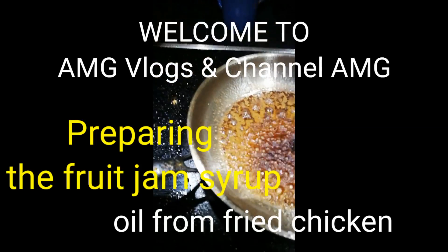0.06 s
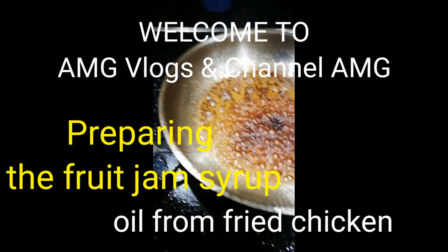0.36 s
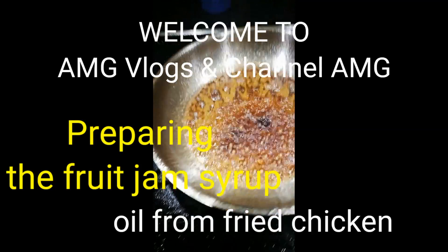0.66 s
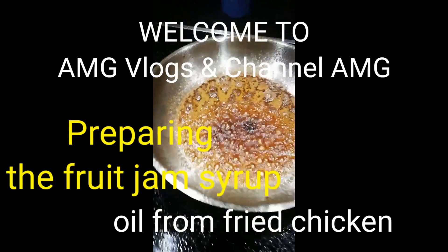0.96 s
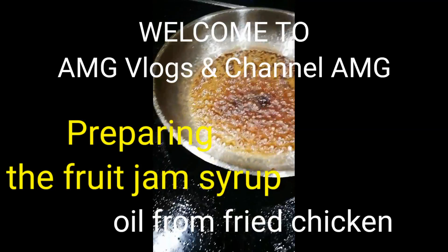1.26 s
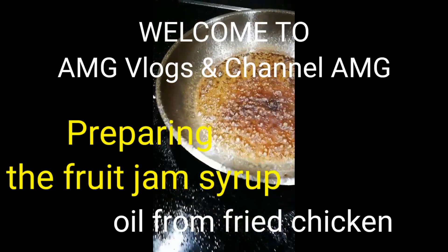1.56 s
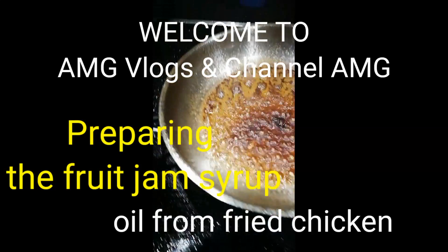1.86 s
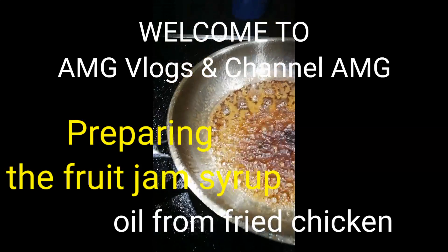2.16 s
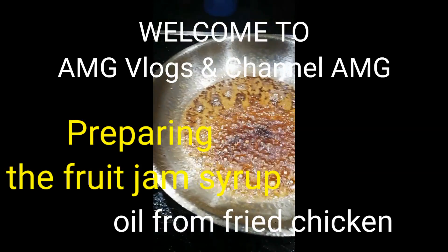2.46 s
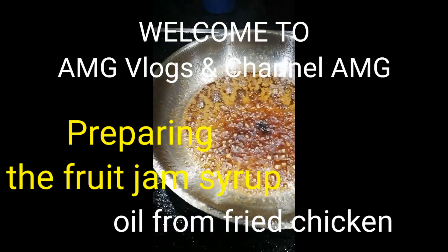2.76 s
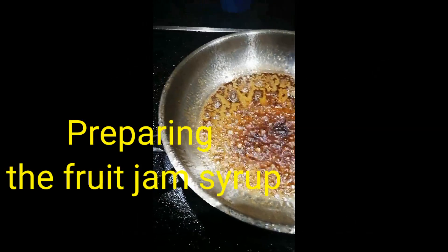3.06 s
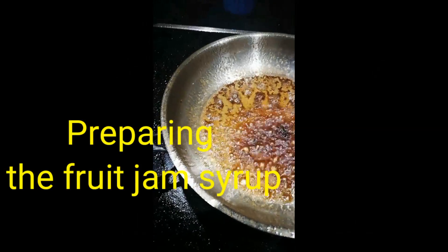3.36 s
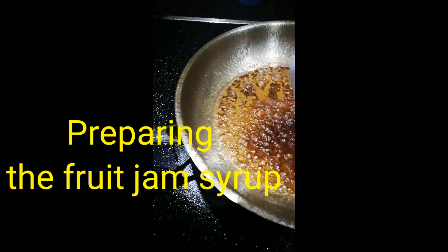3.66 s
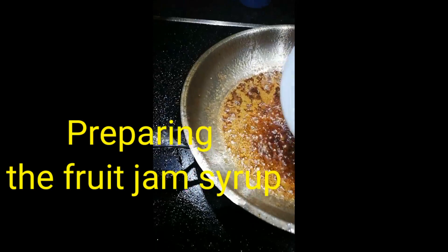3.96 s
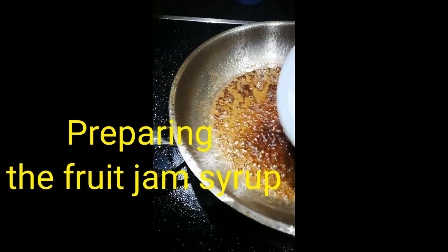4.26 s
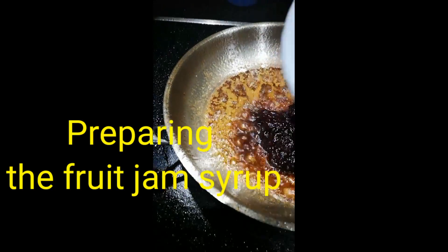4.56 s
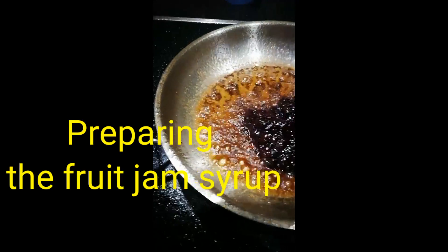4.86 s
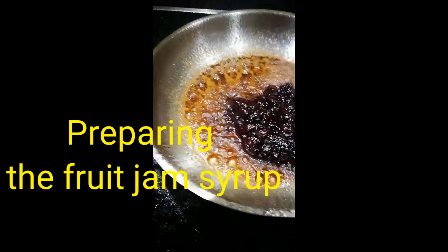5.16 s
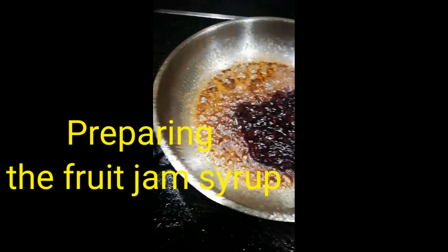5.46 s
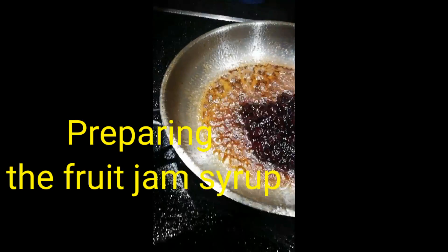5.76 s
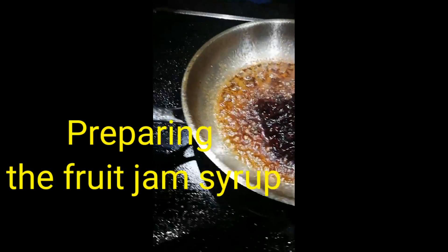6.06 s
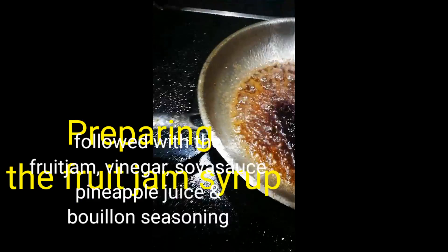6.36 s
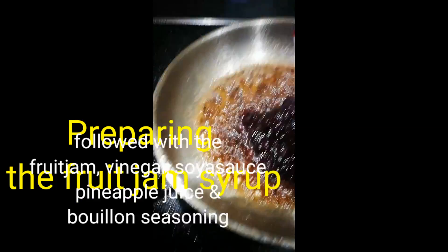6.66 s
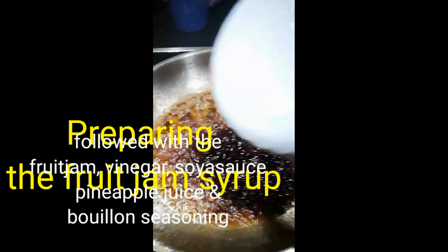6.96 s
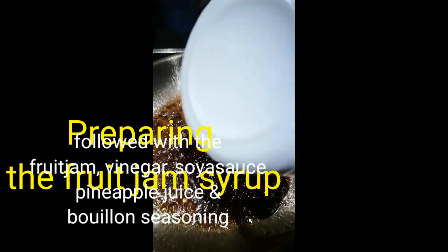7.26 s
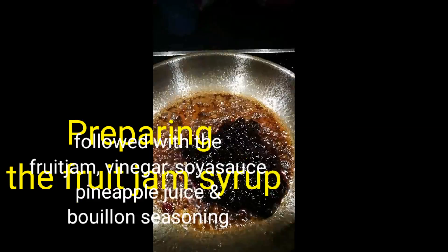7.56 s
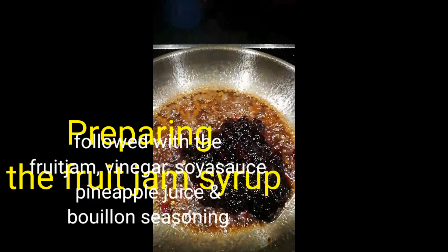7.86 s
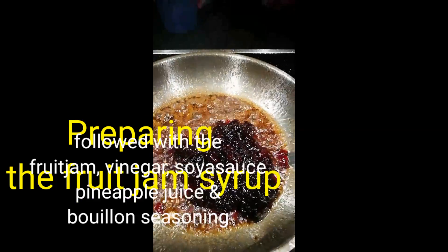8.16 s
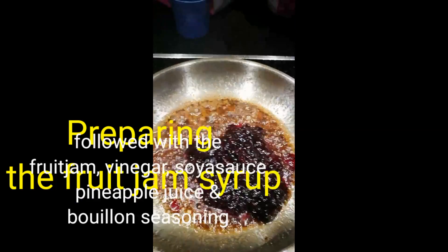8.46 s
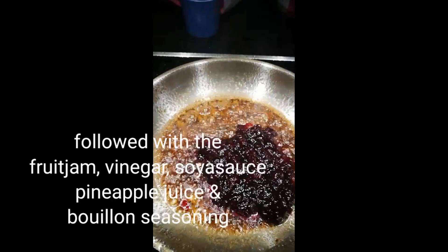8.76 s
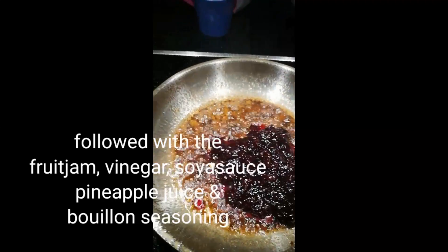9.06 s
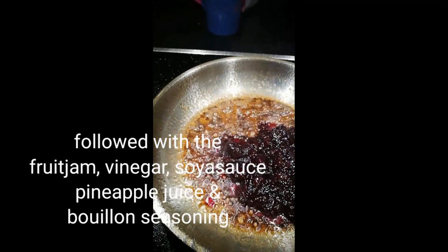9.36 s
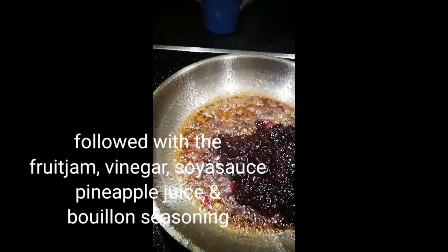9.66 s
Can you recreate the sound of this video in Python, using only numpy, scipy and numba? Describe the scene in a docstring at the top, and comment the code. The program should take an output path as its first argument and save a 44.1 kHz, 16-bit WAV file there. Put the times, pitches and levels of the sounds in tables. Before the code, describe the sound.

Syrup sizzles and bubbles in a frying pan, boiling harder after jam squelches in, and a dish is set down with a knock.

```python
"""Syrup fries in oil in a steel pan: tiny steam bubbles fizz, larger ones boil and simmer, and fat spits.
Each bubble is a damped sine that chirps upward. Halfway a lump of wet jam squelches in and the boil
flares up, its pitch sinking as the syrup thickens. Later a dish is set down beside the pan with a
ringing knock. The stove rumbles underneath, all heard through the two microphone ports of a phone
swaying above the pan."""
import sys
import numpy as np
from scipy import signal
from scipy.fft import rfft, irfft
from scipy.io import wavfile
from scipy.ndimage import uniform_filter1d
from numba import njit

SR = 44100
rng = np.random.default_rng(int(sys.argv[2]) if len(sys.argv) > 2 else 0)


def pcm_store(signal):
    """Save signal as 16-bit PCM."""
    levels = np.round(np.clip(np.atleast_2d(signal), -1, 1) * 32767)
    wavfile.write(sys.argv[1], SR, levels.astype(np.int16).T)


N = 432180
T = np.arange(N) / SR
TOP_HZ = 15400
JAM_S, WETTING_S = 4.29, 0.79  # the jam lands, then takes this long to wet the hot steel

# The fizz's level ride, which boil and simmer partly follow. Each row: time in seconds, relative dB.
FIZZ_RIDE = [(0.0, -35), (0.7, -34.5), (0.78, -35.5), (2.99, -34.5), (3.07, -32), (3.5, -33), (3.75, -33),
             (4.45, -34), (4.59, -37), (4.7, -35), (4.97, -32), (5.92, -36), (6.08, -37), (6.79, -36),
             (7.17, -38.5), (7.5, -35), (7.93, -35), (8.42, -36.5), (9.07, -36.5), (9.75, -37.5)]


def undb(db):
    """Decibels to gain."""
    return 10 ** (np.asarray(db) / 20)


def curve(rows):
    """Join (seconds, value) rows with straight lines in time."""
    return np.interp(T, *np.transpose(rows))


def envelope(start, attack, hold, release):
    """A straight rise to 1, a hold and an exponential release, all in seconds."""
    age = T - start
    return np.clip(age / attack, 0, 1) * np.exp(-np.maximum(age - attack - hold, 0) / release)


def swell(s, half_s, height):
    """A bell-shaped rise or dip centred on s seconds."""
    return height * np.exp(-((T - s) / half_s) ** 2)


def bursts(rows):
    """Gain of bell-shaped bursts. Each row: centre and half length in seconds, relative level in dB."""
    return sum(swell(s, half_s, 0.76) * undb(db) for s, half_s, db in rows)


def walk(rate):
    """Smooth random drift with a spread of 1, taking rate new values a second."""
    step = max(int(SR / rate), 2)
    held = np.repeat(rng.standard_normal(N // step + 1), step)
    drift = uniform_filter1d(held, step)[:N]
    return drift / drift.std()


def cut(x, hz, kind, order):
    """Butterworth high-pass or low-pass."""
    return signal.sosfilt(signal.butter(order, min(hz, TOP_HZ), kind, fs=SR, output="sos"), x + 1e-18)


def over_pitch(rows):
    """Spread the columns of a table over the spectrum, interpolating in log frequency."""
    hz, *columns = np.transpose(rows)
    axis = np.log(np.arange(N // 2 + 1) * SR / N + 1)
    return [np.interp(axis, np.log(hz), column) for column in columns]


def colour(x, rows):
    """EQ a sound through (Hz, dB) points."""
    return irfft(rfft(x) * undb(over_pitch(rows)[0]), N)


def unit(pair, low_hz, high_hz):
    """Scale a stereo pair so that its centre has rms 1 within a band."""
    band = signal.butter(4, [low_hz, high_hz], "band", fs=SR, output="sos")
    return pair / signal.sosfilt(band, pair.mean(axis=0)).std()


def scatter(x, t60, wet_db):
    """Each port hears a sound and its own spray of reflections from pan wall, hob and tiles."""
    t = T[:int(SR * min(t60, 1)) + 2]
    tail = rng.standard_normal((2, len(t))) * undb(-60 * t / t60)
    tail *= undb(wet_db) / np.sqrt(np.sum(tail ** 2, axis=1, keepdims=True))
    return x + signal.oaconvolve(x[None], tail, axes=1)[:, :N]


def ports(pair):
    """Give two streams the likeness, lag and shading of the two microphone ports."""
    # Each row: frequency in Hz, left minus right in dB, likeness from 0 to 1, left lead in radians.
    stereo_image = [(99, 0.5, 0.98, 0.23), (325, -1.2, 0.97, 0.51), (502, -0.5, 0.8, 2.64),
                    (713, 6, 0.4, 4.3), (896, 12, 0.2, 1.7), (1180, 1, 0.64, 1.45), (2020, 0.5, 0.75, 1.14),
                    (2900, 1, 0.12, 3.13), (3370, 0, 0, 3.4), (4300, -2, 0, 3.62), (6230, 2.5, 0, 3.87),
                    (7280, 2, 0.04, 1.3), (10500, 8, 0, 0.64), (14000, 2, 0, 2.6)]
    lean_db, alike, lead = over_pitch(stereo_image)
    alike, lean = np.clip(alike, 0, .999), undb(lean_db)
    left, other = rfft(pair)
    right = (alike * left + np.sqrt(1 - alike ** 2) * other) * np.exp(-1j * lead)
    centre = np.sqrt(1 + lean ** 2 + 2 * lean * alike * np.cos(lead))
    return irfft(np.array([lean * left, right]) / centre, N)  # the centre keeps its colour


def balance(rows):
    """Left and right gains from (seconds, left minus right dB) rows."""
    return undb(curve(rows) * np.array([[.5], [-.5]]))


def snap(s, db, decay_s):
    """A burst of noise that starts at once and dies within milliseconds."""
    return undb(db) * (T >= s) * np.exp(-np.abs(T - s) / decay_s) * rng.standard_normal(N)


@njit
def ring(times, hz, t60, size, glide):
    """Damped sines, each rising in pitch by the share glide while it dies."""
    out = np.zeros(N)
    for k in range(len(times)):
        start, length = int(times[k] * SR), int(t60[k] * SR) + 2
        turn = 2 * np.pi * hz[k] / SR
        phasor = size[k] + 0j
        step = np.exp(1j * turn - 6.9 / length)
        bend = np.exp(1j * turn * glide / length)
        for i in range(max(start, 0), min(start + length, N)):
            phasor *= step
            step *= bend
            out[i] += phasor.imag
    return out


def bubbles(rate, low_hz, high_hz, tail_octaves, cycles, spread_db, glide, clump_db, echo_s, wet_db,
            spots):
    """Bubbles burst in clumps at spots in the pan; most ring between low_hz and high_hz, a few higher."""
    out = 0
    for _ in range(spots):
        when, pitch, stray, damping, size = rng.random((int(rate * N / SR / spots), 5)).T
        at = (when * N).astype(int)
        low, high = (np.broadcast_to(edge, N)[at] for edge in (low_hz, high_hz))
        pitch = (.3 * pitch + .45 * walk(35)[at]) % 1  # one spot sheds a train of similar bubbles
        blur_hz = 0.062 * np.minimum(high - low, low) * rng.uniform(-1, 1, len(at))
        hz = (low + (high - low) * pitch + blur_hz) * 2 ** (-tail_octaves * np.log(stray))
        db = -spread_db * np.log(np.maximum(size, 1e-2)) + clump_db * walk(80)[at]
        t60 = cycles * (.5 + damping) / hz
        pops = ring(when * N / SR, hz, t60, undb(db) * (hz < TOP_HZ), glide)
        out = out + scatter(pops, echo_s, wet_db)
    return ports(out)


def wetness():
    """0 before the jam lands, 1 once it has spread over the steel."""
    return np.clip((T - JAM_S) / WETTING_S, 0, 1)


def vigour():
    """How far the fizz rides above its average, in dB."""
    db = curve(FIZZ_RIDE)
    return db - db.mean()


def stove():
    """The burner's rumble, booming in the resonances of hob and kitchen."""
    # The rumble's EQ. Each row: frequency in Hz, gain in dB.
    rumble_eq = [(20, -27), (48, -25), (66, -5.5), (93, -13.5), (116, -11), (134, 3), (146, 0.5), (190, -9),
                 (217, 4), (243, -8.5), (295, -4.5), (420, -19.5), (670, -17.5), (713, -10), (760, -17),
                 (930, -8.5), (1500, -24.5)]
    # A hollow note swells now and then. Each row: centre and half length in seconds, relative dB.
    booms = [(3.25, 0.26, -54), (3.6, 0.087, -46.5), (4.01, 0.073, -45), (4.48, 0.13, -52),
             (5.86, 0.084, -45.5), (6.4, .09, -50)]
    boom_hz, width_hz = 288, 19
    flame = colour(ports(rng.standard_normal((2, N))), rumble_eq)
    rumble_db = -49.5 + swell(s=4.25, half_s=0.7, height=2.9) + 0.41 * walk(4.3)
    hollow = signal.butter(2, [boom_hz - width_hz / 2, boom_hz + width_hz / 2], "band",
                           fs=SR, output="sos")
    boom = signal.sosfilt(hollow, ports(rng.standard_normal((2, N))))
    return unit(flame, 90, 296) * undb(rumble_db) + unit(boom, 200, 400) * bursts(booms)


def dish():
    """Each contact clicks at the rim and rings dish and worktop; the kitchen answers briefly."""
    # The dish lands, rocks and settles. Each row: start in seconds, blow in dB, contact low-pass in Hz,
    # pitch as a share of the free ring, rim click in dB.
    contacts = [(7.8828, -7.5, 6000, 0.97, -13), (7.8835, -21, 3000, 1, -24),
                (7.8861, -23, 5000, 0.92, -26), (7.8944, -25, 11000, 0.96, -16),
                (7.927, -24, 2500, 0.94, -40), (7.951, -20.5, 2400, 0.98, -32),
                (7.9565, -28, 2400, 0.95, -23), (8.187, -30, 900, 0.79, -52),
                (8.1897, -23.5, 1100, 0.86, -50)]
    # Modes of dish and worktop. Each row: frequency in Hz, relative level in dB, t60 in seconds.
    modes = [(256, -19, 0.056), (363, -12.5, 0.024), (554, -24, 0.017), (770, -15, 0.01),
             (1040, -16, 0.0064), (1290, -19.5, 0.13), (1570, 4, 0.005), (2240, 2, 0.0046),
             (2650, -16, 0.02), (3620, -14, 0.1), (4340, -24, 0.05), (5405, -18, 0.08), (6370, -18, 0.03),
             (7850, -12, 0.02)]
    hz, db, t60 = np.array(modes, float).T.copy()
    body = click = 0
    for s, blow_db, soft_hz, pitch, click_db in contacts:
        knock = ring(np.full_like(hz, s), hz * pitch, t60, -undb(db + blow_db), glide=0.)
        body = body + cut(knock, soft_hz, "low", order=1)
        click = click + snap(s, click_db, decay_s=0.0034)
    click = cut(cut(click, 2400, "high", order=2), 7000, "low", order=4)
    sound = cut(body + click, 250, "high", order=6)  # too small to radiate bass
    return scatter(sound, t60=0.19, wet_db=-6) * undb([[-2], [1.5]])


def plops():
    """Single big bubbles burst through the thick syrup, which muffles their onset."""
    # Each row: start in seconds, relative level in dB, pitch in Hz.
    big_bubbles = [(1.93, -39.5, 1710), (4.468, -36, 2000), (4.565, -37, 1800), (9.218, -39, 2100),
                   (9.313, -31, 2200), (9.474, -37, 2200)]
    s, db, hz = np.array(big_bubbles, float).T.copy()
    sound = cut(ring(s, hz, 12 / hz, undb(db), glide=0.32), 1000, "high", order=2)
    return scatter(sound, t60=0.05, wet_db=19.0) * undb([[0.5], [-2.5]])


def spits():
    """Droplets crack in the hot fat, each around its own pitch, nearer the left port."""
    # Each row: start in seconds, relative level in dB, pitch in Hz.
    droplets = [(1.9719, -16, 8100), (2.8639, -12, 5000), (2.868, -14, 5200), (3.8452, -15, 9400),
                (3.8516, -12, 9400), (4.794, -11, 5000), (6.6812, -19, 4000), (7.6899, -19, 4500),
                (8.0431, -12, 8000), (9.2658, -15, 5000)]
    cracks = 0
    for s, db, hz in droplets:
        crack = cut(snap(s, db, decay_s=0.0032), 0.8 * hz, "high", order=2)
        cracks = cracks + cut(crack, 2.1 * hz, "low", order=2)
    return scatter(cracks, t60=0.022, wet_db=4.0) * undb([[-8], [-14]])


def jam():
    """The wet lump spatters as it lands and traps steam, which squelches out at a sinking pitch."""
    # Its underside meets the fat: centre and half length in seconds, relative level in dB.
    touchdown = (4.54, 0.17, -36)
    pocket_hz = 1420 - 270 * wetness()  # steam pockets grow as the lump spreads
    squelch = bubbles(rate=1800, low_hz=pocket_hz - 150, high_hz=pocket_hz + 150, tail_octaves=0.027,
                      cycles=26, spread_db=2.5, glide=.04, clump_db=-1.0, echo_s=0.02, wet_db=3, spots=4)
    spatter = bubbles(rate=4900, low_hz=2580, high_hz=3450, tail_octaves=0.052, cycles=21,
                      spread_db=1.5, glide=.03, clump_db=3.0, echo_s=0.031, wet_db=5, spots=6)
    squelch = unit(cut(squelch, 1000, "high", order=4), 1000, 1800)
    spatter = unit(cut(spatter, 1300, "high", order=2), 1900, 3160)
    flow = envelope(JAM_S, attack=0.082, hold=0.4, release=0.069)
    return squelch * undb(-47) * flow + spatter * bursts([touchdown])


def simmer():
    """Larger, well-damped bubbles mutter underneath and gain as the syrup cooks down."""
    # Each row: frequency in Hz, gain in dB.
    simmer_eq = [(120, -47), (400, -12), (560, -14), (720, -9), (920, -0.5), (1120, -2), (1350, 4.5),
                 (1700, 3), (2050, 7.5), (2700, 1.5), (4000, 13)]
    rise_db_per_s = 0.57
    sound = bubbles(rate=3800, low_hz=548, high_hz=2265, tail_octaves=0.18, cycles=6.2,
                    spread_db=2.0, glide=0.15, clump_db=1.2, echo_s=0.066, wet_db=1.5, spots=8)
    db = -47.5 + 0.42 * vigour() + rise_db_per_s * (T - JAM_S)
    return unit(colour(sound, simmer_eq), 810, 2080) * undb(db)


def chorus():
    """In a hard boil, bubbles of one size ring together: a narrow, centred band that wanders and sinks."""
    # Each row: centre and half length in seconds, relative level in dB, pitch in Hz.
    choruses = [(4.885, 0.044, -33.5, 4220), (4.985, 0.03, -35.5, 3680), (5.15, 0.13, -35, 3610),
                (5.66, .14, -42, 3610), (6.48, 0.09, -36.5, 3570), (6.68, 0.15, -33.5, 3540),
                (7.65, 0.31, -43, 3560)]
    rows = np.array(choruses)
    hz = curve(rows[:, [0, 3]]) + 50 * walk(9)
    sound = bubbles(rate=1500, low_hz=hz - 65, high_hz=hz + 65, tail_octaves=0.0079, cycles=120,
                    spread_db=1.5, glide=0.005, clump_db=2.0, echo_s=.003, wet_db=-1, spots=4)
    centre = cut(sound.mean(axis=0, keepdims=True), 2370, "high", order=4)
    return unit(centre, 2700, 5200) * bursts(rows[:, :3])


def crackle(rate, spread_db, spots=4):
    """Specks of fat snap: sharp ticks, most faint, at a few spots in the pan."""
    out = 0
    for _ in range(spots):
        when, size = rng.random((int(rate * N / SR / spots), 2)).T
        gain = undb(-spread_db * np.log(np.maximum(size, 1e-2)))
        ticks = np.bincount((when * N).astype(int), gain, N)
        out = out + scatter(cut(ticks, 9600, "high", order=2), t60=.012, wet_db=-1)
    return ports(out)


def fizz():
    """Water flashes to steam in the oil: countless tiny pops and ticks over a fine hiss."""
    # Each row: frequency in Hz, gain in dB.
    fizz_eq = [(300, -22.5), (1500, -16.5), (2600, -6), (3550, -3), (5300, 1.5), (7400, -0.5), (9800, -0.5),
               (11200, -5), (12800, -10), (15200, -15)]
    # The fizz leans from side to side. Each row: time in seconds, left minus right in dB.
    lean = [(0, -5.5), (1.1, 0.1), (2.2, -2.2), (4.6, -2.5), (5.1, 2), (5.8, 2), (6.1, -1.5), (6.6, -1.5),
            (7.25, -7), (7.6, -2.5), (8.1, -4), (8.6, -4), (9.8, -2)]
    pops = bubbles(rate=10000, low_hz=2640, high_hz=14600, tail_octaves=0.058, cycles=12.4,
                   spread_db=3.5, glide=0.092, clump_db=2.5, echo_s=.012, wet_db=3.5, spots=6)
    ticks = undb(-4.0) * unit(crackle(rate=200, spread_db=4.5), 7000, 14200)
    hiss = undb(1.5) * unit(ports(rng.standard_normal((2, N))), 7600, 11750)
    flicker = undb(0.33 * walk(30))
    sound = colour((unit(pops, 6700, 13600) + ticks + hiss) * flicker, fizz_eq)
    return unit(sound, 7310, 15400) * undb(curve(FIZZ_RIDE) - 1.0) * balance(lean)


def boil():
    """Small steam bubbles chirp in the syrup: sputtering in the oil, then flaring up in the jam."""
    # Each row: frequency in Hz, gain in dB.
    boil_eq = [(500, -34), (2000, -19), (2450, -5), (2880, 0), (3170, 0), (3550, 0.5), (3900, 1.5),
               (4400, 1.5), (4750, 1), (5300, 0), (5800, 0), (8000, 2.5), (14000, -24)]
    # The boil wells up or lulls. Each row: centre and half length in seconds, lift or dip in dB.
    surges = [(1.332, 0.11, -7), (2.3, 0.041, 4), (2.43, 0.028, 4), (3.236, 0.047, 5.5),
              (3.456, 0.029, 5.5), (3.65, 0.071, 5.5), (4.377, 0.032, 3), (4.518, 0.11, 3.5),
              (4.877, 0.018, 0), (6.17, 0.15, -1.5), (6.602, 0.2, 0), (7.687, 0.39, 0.5)]
    thin_hz, thick_hz, thickens_s, sag_hz_per_s = 3145, 2460, 5.73, 315
    wet = wetness()
    # The jam's first water flashes to steam.
    flare_db = 1.2 * envelope(start=4.84, attack=0.09, hold=0.44, release=0.1)
    surge_db = sum(swell(*row) for row in surges) + flare_db
    low_hz = np.clip(thin_hz - sag_hz_per_s * (T - thickens_s), thick_hz, thin_hz)
    high_hz = 5326 - 130 * np.maximum(surge_db, 0)  # a harder boil sheds fewer of the smallest bubbles
    sound = bubbles(rate=7000, low_hz=low_hz, high_hz=high_hz, tail_octaves=0.099, cycles=21.8,
                    spread_db=2.5, glide=0.02, clump_db=1.0, echo_s=.03, wet_db=6.0, spots=12)
    sputter_db = 1.5 * (1 - wet) * walk(9.2)  # uneven while there is little water
    db = -42 + 9 * wet ** 1.2 + 0.065 * vigour() + surge_db + sputter_db
    return unit(colour(sound, boil_eq), 2200, 5000) * undb(db)


def pan_ring(x):
    """The pan's hollow rings with what fries in it, lifting a few narrow bands."""
    # Each row: centre in Hz, width in Hz, lift in dB.
    resonances = [(2910, 120, 1.3), (3540, 120, 2.4), (4200, 110, 0.5), (5260, 170, 2)]
    hz = np.arange(N // 2 + 1) * SR / N
    db = sum(lift / (1 + (2 * (hz - centre) / width) ** 2) for centre, width, lift in resonances)
    return irfft(rfft(x) * undb(db), N)


def scene():
    """The frying pan under a swaying phone, the stove and the dish."""
    # The phone sways over the pan. Each row: time in seconds, left minus right in dB.
    sway = [(0, 5.5), (1.2, 2), (2.2, 3.5), (4.2, 3.5), (5.2, 2.5), (6.2, 1.2), (7.2, 4), (8.2, 5),
            (9.8, 2)]
    frying = pan_ring(fizz() + boil() + chorus() + simmer() + jam()) * balance(sway)
    return frying + spits() + plops() + stove() + dish()


def record(dry):
    """The phone rounds the loudest peak and cuts the top."""
    top_cut = signal.ellip(14, .2, 80, TOP_HZ, fs=SR, output="sos")
    return signal.sosfilt(top_cut, np.tanh(dry))


dry = scene()
out = record(dry)
pcm_store(out)
```